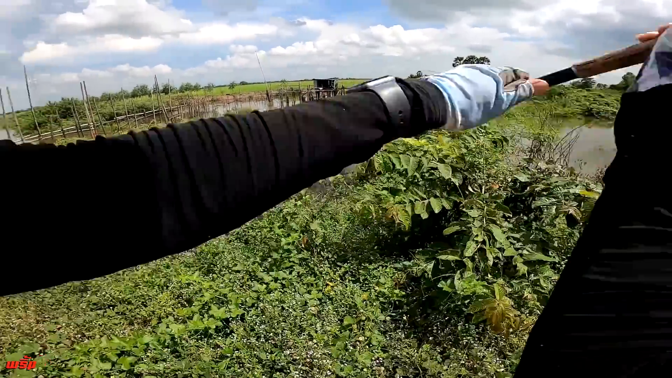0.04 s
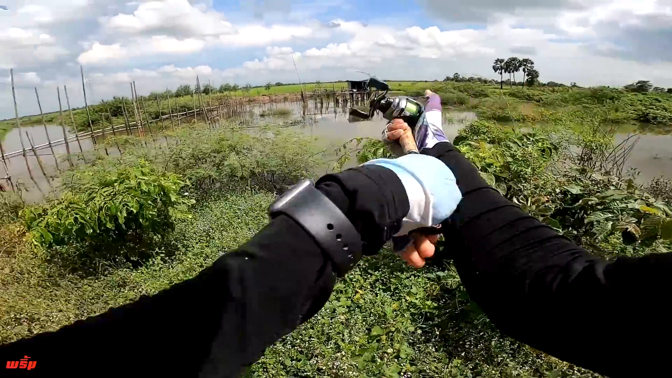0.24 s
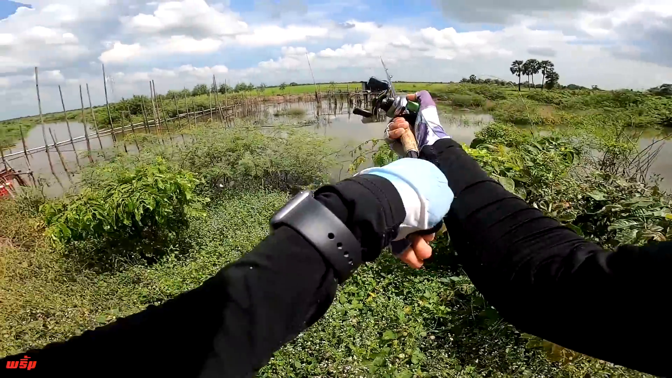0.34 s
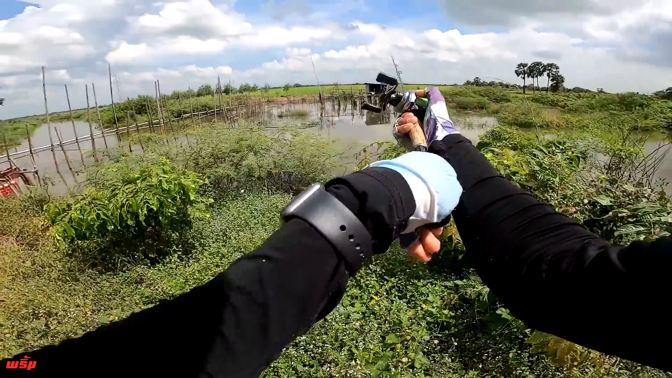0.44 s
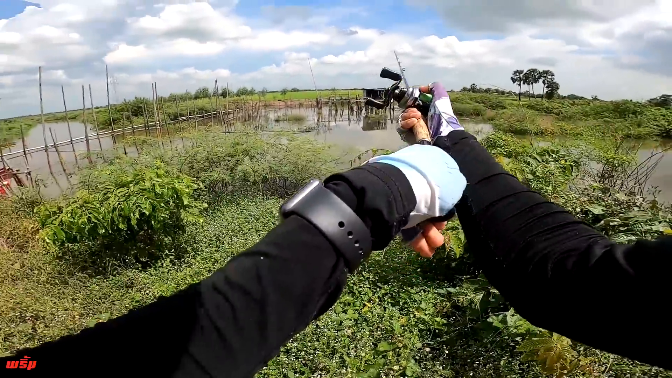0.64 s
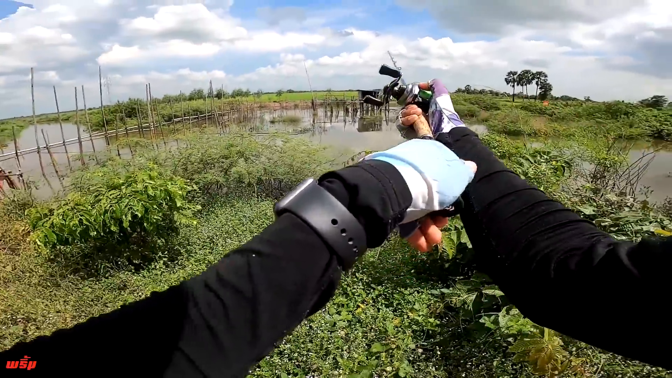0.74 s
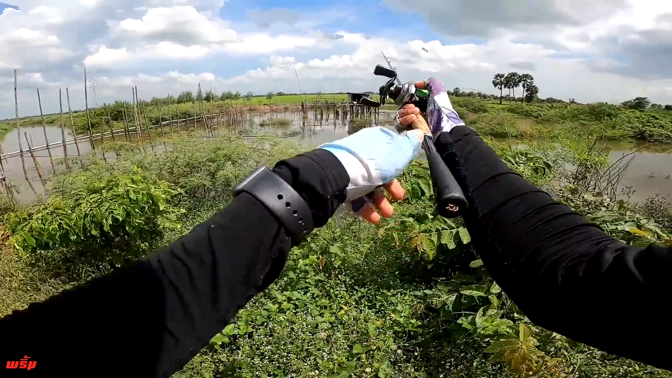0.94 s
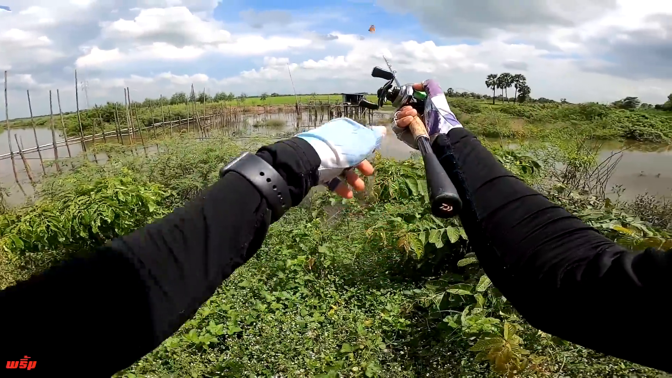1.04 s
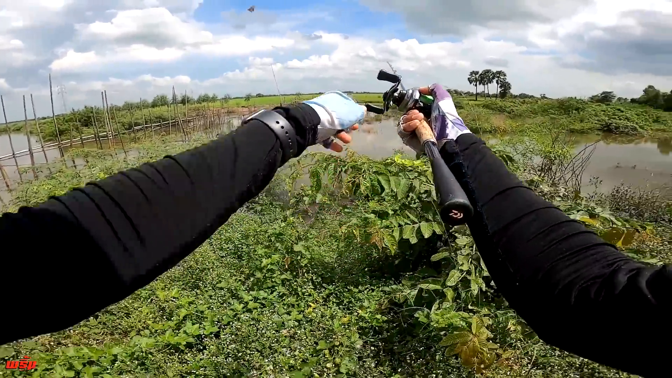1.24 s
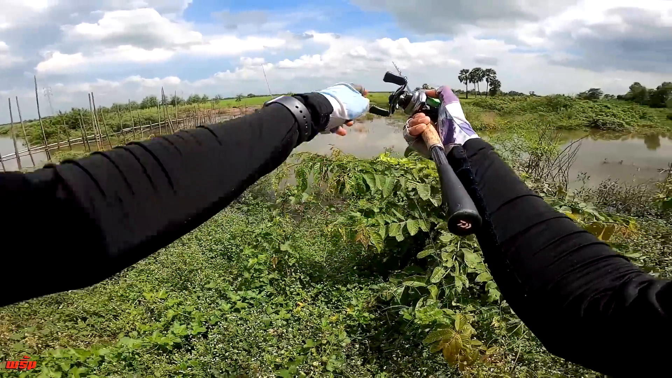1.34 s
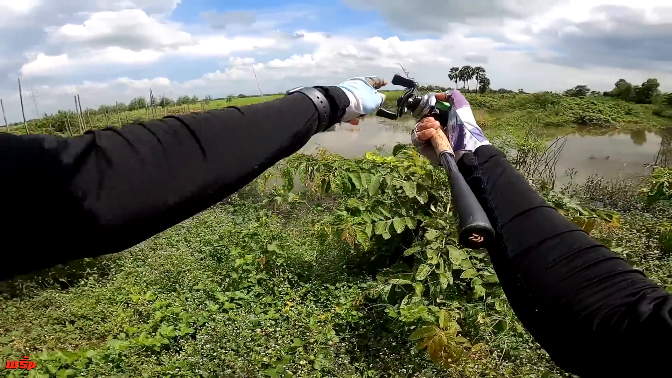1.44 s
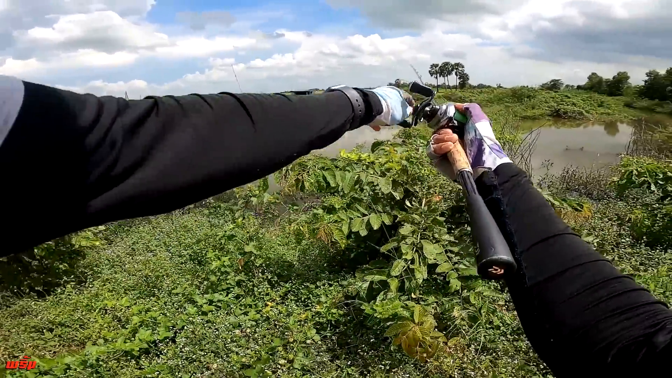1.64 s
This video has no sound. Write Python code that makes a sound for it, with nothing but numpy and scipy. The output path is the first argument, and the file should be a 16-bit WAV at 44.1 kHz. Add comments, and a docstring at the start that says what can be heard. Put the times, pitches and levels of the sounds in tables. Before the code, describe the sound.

Close, nearly centred outdoor sound of a fishing cast: sharp click, fast bright whoosh with line chatter, whirring reel slowing and fading within half a second, small clicks, sleeve rustle, distant bird twitter and light breeze.

```python
"""A cast fishing rod swishes past: noise in narrow bands, some of rising pitch, over a broad rush of air.
The spool whirs down as harmonics of its turning rate; line hisses and rasps in the guides as noise and ringing.
The reel clicks as struck modes, and sleeves and glove rustle as coloured noise. Small birds chirp as falling
sines, an insect buzzes as narrow noise, and open air and a light breeze are coloured noise."""
import sys
import numpy as np
from scipy import signal
from scipy.io import wavfile

SR = 44100
rng = np.random.default_rng(int(sys.argv[2]) if len(sys.argv) > 2 else 0)


def persist_wave(psi):
    """Save psi, clipped to +-1, as 16-bit WAV."""
    counts = np.round(np.clip(psi, -1, 1) * 32767).astype(np.int16)
    wavfile.write(sys.argv[1], SR, np.atleast_2d(counts).T)


N = 74970
TIME = np.arange(N) / SR  # s

# In every colour table below, levels are relative densities per Hz.
# open air: (frequency [Hz], level [dB])
AIR_COLOUR = [(30, -15), (210, 3), (650, 1), (1100, -9.5), (2500, -7), (4000, -3), (5500, -9.5),
              (7200, -14), (9500, -54), (12500, -17.5), (14500, -50)]
AIR_DB = -49
# breeze on the microphone: (time [s], level [dB])
BREEZE_LEVEL = [(0, -51.5), (.15, -68), (.28, -52), (.4, -70), (.75, -75), (.9, -58.5), (1.15, -51),
                (1.46, -54), (1.57, -46), (1.7, -56)]
# colour of the breeze: (frequency [Hz], level [dB])
BREEZE_COLOUR = [(25, -17.5), (55, 8.5), (160, 1), (400, -29), (1500, -65)]

# bursts of the insect's buzz: (start [s], length [s], peak level [dB])
BUZZES = [(.64, .058, -58.5), (0.989, 0.15, -60.5), (1.32, .14, -65)]
BUZZ_HZ, BUZZ_WIDTH_HZ = 11150, 280

# bird chirps, each a short fall: (middle time [s], middle pitch [Hz], peak level [dB])
CHIRPS = [(.585, 4140, -43.5), (.775, 4150, -44.5), (.827, 3870, -42.5), (.852, 4150, -47),
          (.932, 3920, -46), (1.033, 4650, -48), (1.048, 5550, -48), (1.104, 3820, -44),
          (1.221, 3830, -45.5), (1.24, 3790, -44.5)]
CHIRP_S, CHIRP_FALL_HZ_PER_S, CHIRP_WAVER_HZ = 0.029, 30000, 90
# the rest of the flock, swelling and fading about one moment
CHORUS_HZ, CHORUS_WIDTH_HZ, CHORUS_DB, CHORUS_FLUTTER_DB = 4024, 730, -49.5, 2.1
CHORUS_S, CHORUS_SPREAD_S = 0.74, 0.32

# sleeves and glove rubbing: (time [s], level [dB])
RUSTLE_LEVEL = [(0, -47), (.045, -44), (.15, -50.5), (.2, -38.5), (.3, -40), (.86, -55.5), (.92, -41.5),
                (.98, -40.5), (1.09, -45.5), (1.14, -52.5), (1.42, -56.5), (1.485, -47), (1.56, -54.5),
                (1.62, -47.5), (1.7, -56)]
# colour of the rubbing: (frequency [Hz], level [dB])
RUSTLE_COLOUR = [(120, -8.5), (270, -1.5), (700, -8), (950, -8), (1350, -3), (3000, -2.5), (5000, -7.5),
                 (8000, -22), (14000, -28)]
# forearm sweeping across to the reel: (time [s], level [dB])
SLEEVE_LEVEL = [(1.36, -65), (1.45, -53.5), (1.52, -47), (1.63, -46), (1.7, -49)]
# colour of the sweep: (frequency [Hz], level [dB])
SLEEVE_COLOUR = [(100, 3), (300, -3.5), (700, 3), (1300, -13), (3000, -25), (3900, 1.5), (4800, -2),
                 (5800, -11), (8500, -15), (11000, -37), (14000, -53)]

# clicks of the reel and grip: (time [s], strength [dB])
CLICKS = [(.045, -27.5), (.199, -18), (.2535, -21), (.667, -24.5), (.7325, -31), (.783, -31), (.892, -28),
          (.984, -26)]
# modes the clicks excite: (frequency [Hz], strength before softening [dB], t60 [s])
REEL_MODES = [(1300, -13.5, 0.015), (2030, -10, 0.012), (2500, 0.5, 0.0028), (3590, -1.5, 0.0067),
              (7160, -17, 0.0038)]
CONTACT_HZ, MODE_SPREAD_DB = 3600, 1  # soft contacts strike weakly above this frequency

# line rasping on the guides as it is snatched off the spool: (time [s], level [dB])
RASP_LEVEL = [(.22, -67), (.236, -29.5), (.28, -34), (.299, -23.5), (.313, -29), (.336, -24.5), (.37, -77)]
# modes of the guides: (frequency [Hz], relative level [dB], t60 [s])
GUIDE_MODES = [(3450, -0.5, 0.015), (3790, 0.5, 0.02), (4550, 0.5, 0.0043)]
RASP_PER_S, RASP_SPREAD_DB = 2400, 2  # mean contact rate; scale of their uneven sizes

# line running through the guides: (time [s], level [dB])
LINE_LEVEL = [(.22, -54), (.3, -24.5), (.385, -36), (.425, -36), (.5, -43.5), (.62, -48), (.665, -38),
              (.69, -54.5), (.735, -41.5), (.77, -55), (.9, -50), (1.3, -89)]
# colour of the line's hiss: (frequency [Hz], level [dB])
LINE_COLOUR = [(150, -20), (300, -1), (600, 2), (900, -7), (1700, 4), (2700, -1), (3800, 3), (5500, -10),
               (7000, -7), (9000, -44), (12000, -8), (15000, -55)]
LINE_THROB = 0.35  # depth as a fraction of the hiss
LINE_RING_HZ, LINE_RING_WIDTH_HZ = 7070, 530
LINE_RING_DB, LINE_RING_FOLLOWS = -32.5, 0.52  # level at a line level of 0 dB; dB per dB of line level

# the spool's speed: (time [s], rate [turns per second])
SPOOL_RATE = [(.26, 392), (.335, 357), (.39, 334), (.435, 316), (.495, 302), (.56, 268), (.62, 239),
              (.69, 213), (.8, 187), (.95, 150)]
# gain of the spool's whir: (time [s], level [dB])
SPOOL_LEVEL = [(.235, -67), (.28, -32.5), (.4, -36.5), (.48, -37.5), (.57, -42), (.65, -45.5), (.77, -50),
               (.86, -72)]
# multiples of the turning rate, from the first up: (level before body, flutter and dulling [dB])
WHIR_ORDERS = [-11.5, -5, -16, -8.5, -5, -8, -7]
WHIR_LOW_HZ, WHIR_TOP_HZ = 230, 2170  # the reel's body passes the whir between these
WHIR_WOBBLE = .0055  # spread as a fraction of the spool's speed
WHIR_FLUTTER_DB, WHIR_DULLING_DB = 4, 11  # both times log10(order); dulling is per octave of slowing

# the rod's swing: (time [s], level [dB])
SWING_LEVEL = [(.17, -86), (.228, -41), (.244, -28.5), (.256, -19.5), (.272, -17), (.286, -17.5),
               (.301, -16), (.311, -21.5), (.333, -27.5), (.35, -37), (.42, -69)]
# pitch of the eddies shed by the rod: (time [s], pitch [Hz])
EDDY_PITCH = [(.243, 882), (.256, 1138), (.271, 1679), (.287, 1644), (.301, 1972), (.321, 2122),
              (.345, 1832)]
# eddy tones: (multiple of that pitch, width [Hz], level [dB])
EDDIES = [(1, 340, -1.3), (2, 440, -11)]
# narrow bands of noise within the swish: (frequency [Hz], width [Hz], level [dB])
SWISH_BANDS = [(761.6, 26, -16), (1144, 57, -18.5), (1497, 78, -15.5), (1738, 76, -22)]
# broad rush of air round the rod: (frequency [Hz], level [dB])
RUSH_COLOUR = [(130, -32), (450, -9), (900, -6.5), (1500, -2.5), (2500, 0), (4000, 0), (5200, -6),
               (7500, -6), (9500, -24), (12000, -6), (14000, -35)]
RUSH_DB, RUSH_PATCHY_DB = -2, 2
TREBLE_HZ, TREBLE_DB_PER_OCTAVE = 2500, 6  # swish treble falls by this below the highest eddy pitch
# the arm's draught on the microphone
PUFF_S, PUFF_WIDTH_S, PUFF_HZ, PUFF_BAND_HZ, PUFF_DB = 0.296, 0.013, 215, 170, -34.5

SPLIT_HZ = 11730  # above this the two microphones disagree
SPLIT_DB, TOP_LOSS_DB = -7.5, -11  # gains of the differing and the shared top treble
OVERLOAD = .7  # ceiling of the rounding, full scale 1
CUTOFF_HZ = 15400


def from_db(db):
    """Logarithmic levels become amplitude ratios."""
    return 10 ** (np.asarray(db) / 20)


def rms_one(x):
    """Normalisation by mean power: scale to rms 1."""
    return x / np.sqrt(np.mean(x ** 2) + 1e-20)


def in_time(rows):
    """Linear interpolation of a two-column curve at every sample."""
    s, values = np.transpose(rows)
    return np.interp(TIME, s, values)


def bell(middle_s, spread_s):
    """Gaussian envelope: a smooth swell and fade of height 1."""
    return np.exp(-.5 * ((TIME - middle_s) / spread_s) ** 2)


def drift(rate_hz):
    """Low-passed white noise: smooth random variation of rms 1."""
    r = np.exp(-2 * np.pi * rate_hz / SR)
    smooth = signal.lfilter([1], [1, -2 * r, r * r], rng.standard_normal(2 * N))
    return rms_one(smooth[N:])  # the filter settles in the first half


def filtered(x, hz, kind, order=2):
    """Butterworth filtering: a maximally flat low-, high- or band-pass."""
    return signal.sosfilt(signal.butter(order, hz, kind, fs=SR, output="sos"), x)


def narrow_noise(hz, width_hz):
    """Quadrature modulation: low-passed noise shifted to a centre that may move; rms 1."""
    a, b = filtered(rng.standard_normal((2, N)), width_hz / 2, "low")
    phase = 2 * np.pi * np.cumsum(hz + np.zeros(N)) / SR
    return rms_one(a * np.cos(phase) + b * np.sin(phase))


def coloured_noise(colour, patchy_db):
    """Spectral shaping in third octaves: noise bands flicker independently; rms 1."""
    edges = 22 * 2 ** (np.arange(30) / 3)
    hz, db = np.transpose(colour)
    white, out = rng.standard_normal((2, N)), 0
    for k, (low, high) in enumerate(zip(edges, edges[1:])):
        # neighbouring bands draw on independent noises
        band = filtered(white[k % 2], [low, high], "band")
        band_db = np.interp(np.log(low * high) / 2, np.log(hz), db)
        out = out + band * from_db(band_db + patchy_db * drift(24.8))
    return rms_one(out)


def ring(hits, hz, t60):
    """Damped resonance: a unit hit starts a decaying sine of initial height 1."""
    r = np.exp(-np.log(1000) / (t60 * SR))
    w = 2 * np.pi * hz / SR
    return signal.lfilter([0, np.sin(w)], [1, -2 * r * np.cos(w), r * r], hits + 1e-18)


def chatter(modes, per_s, spread_db):
    """Random impact excitation: dense contacts of uneven size ring a set of modes; rms 1."""
    sizes = from_db(spread_db * np.minimum(rng.exponential(1, N), 3))
    signs = rng.choice([-1, 1], N)
    hits = sizes * signs * (rng.random(N) < per_s / SR)
    out = 0
    for k, (hz, db, t60) in enumerate(modes):
        out = out + from_db(db) * (-1) ** k * ring(hits, hz, t60)
    return rms_one(out)


def open_air():
    """Broadband ambience: coloured noise of constant mean level."""
    return from_db(AIR_DB) * coloured_noise(AIR_COLOUR, patchy_db=2.9)


def breeze():
    """Wind noise at a microphone: low coloured noise swells in gusts."""
    return from_db(in_time(BREEZE_LEVEL)) * coloured_noise(BREEZE_COLOUR, patchy_db=2)


def insect():
    """Narrow-band noise: short rounded bursts make a high buzz."""
    level = 0
    for s, length, db in BUZZES:
        progress = np.clip((TIME - s) / length, 0, 1)
        level = level + from_db(db) * np.sqrt(np.abs(np.sin(np.pi * progress)))
    return level * narrow_noise(BUZZ_HZ, BUZZ_WIDTH_HZ)


def flock():
    """Superposition of distant voices: fluttering narrow noise stands for a blurred twitter."""
    level = from_db(CHORUS_DB + CHORUS_FLUTTER_DB * drift(32))
    return level * bell(CHORUS_S, CHORUS_SPREAD_S) * narrow_noise(CHORUS_HZ, CHORUS_WIDTH_HZ)


def chirps():
    """Frequency modulation: brief sines fall in pitch with a random waver."""
    out, waver = 0, CHIRP_WAVER_HZ * drift(280)
    for s, hz, db in CHIRPS:
        t = np.clip(TIME - s, -CHIRP_S / 2, CHIRP_S / 2)
        phase = 2 * np.pi * np.cumsum(hz - CHIRP_FALL_HZ_PER_S * t + waver) / SR
        envelope = np.cos(np.pi * t / CHIRP_S) ** 2
        out = out + from_db(db) * envelope * np.sqrt(2) * np.sin(phase)
    return out


def rustle():
    """Friction noise: glove and cloth rub as patchy coloured noise."""
    return from_db(in_time(RUSTLE_LEVEL)) * coloured_noise(RUSTLE_COLOUR, patchy_db=3.5)


def sleeve():
    """Friction noise: a sleeve sweeps as smoother coloured noise."""
    return from_db(in_time(SLEEVE_LEVEL)) * coloured_noise(SLEEVE_COLOUR, patchy_db=1)


def clicks():
    """Modal excitation: each soft impact strikes the reel's modes with strengths of its own."""
    out = 0
    for s, db in CLICKS:
        hit = filtered(1. * (np.arange(N) == int(s * SR)), CONTACT_HZ, "low")
        for k, (hz, mode_db, t60) in enumerate(REEL_MODES):
            strength = from_db(db + mode_db + MODE_SPREAD_DB * rng.standard_normal())
            out = out + strength * (-1) ** k * ring(hit, hz, t60)
    return out


def rasp():
    """Repeated impact: the line chatters through the rod's guides at the launch."""
    return from_db(in_time(RASP_LEVEL)) * chatter(GUIDE_MODES, RASP_PER_S, RASP_SPREAD_DB)


def line(turn):
    """Amplitude modulation: friction hiss throbs once per turn over a faint ring in the guides."""
    db = in_time(LINE_LEVEL)
    hiss = coloured_noise(LINE_COLOUR, patchy_db=2) * (1 + LINE_THROB * np.sin(turn))
    ring_level = from_db(LINE_RING_DB + LINE_RING_FOLLOWS * db) * (TIME > LINE_LEVEL[0][0])
    return from_db(db) * hiss + ring_level * narrow_noise(LINE_RING_HZ, LINE_RING_WIDTH_HZ)


def whir(rate, turn):
    """Harmonics through a fixed body: upper orders flutter more and fade as the rotation slows."""
    out = 0
    for k, db in enumerate(WHIR_ORDERS, 1):
        top_loss = 1 + (k * rate / WHIR_TOP_HZ) ** 24
        low_loss = 1 + (WHIR_LOW_HZ / (k * rate)) ** 4
        passed = (top_loss * low_loss) ** -.5
        change_db = WHIR_FLUTTER_DB * drift(28) + WHIR_DULLING_DB * np.log2(rate / rate.max())
        level = from_db(db + np.log10(k) * change_db)
        out = out + passed * level * np.sin(k * turn + rng.uniform(0, 2 * np.pi))
    return from_db(in_time(SPOOL_LEVEL)) * np.sqrt(2) * out


def spool_and_line():
    """Shared rotation: one slowing, wobbling turn drives the whir and the line's throb."""
    rate = in_time(SPOOL_RATE)
    turn = 2 * np.pi * np.cumsum(rate * (1 + WHIR_WOBBLE * drift(37.4))) / SR
    return whir(rate, turn) + line(turn)


def arm_draught():
    """Air displacement at a microphone: one brief low puff of noise."""
    return from_db(PUFF_DB) * bell(PUFF_S, PUFF_WIDTH_S) * narrow_noise(PUFF_HZ, PUFF_BAND_HZ)


def rod():
    """Vortex shedding: eddy tones follow the pitch curve with a rush of air and a few narrow fixed bands."""
    pitch = in_time(EDDY_PITCH)
    swish = from_db(RUSH_DB) * coloured_noise(RUSH_COLOUR, RUSH_PATCHY_DB)
    for multiple, width, db in EDDIES:
        swish = swish + from_db(db) * narrow_noise(multiple * pitch, width)
    for hz, width, db in SWISH_BANDS:
        swish = swish + from_db(db) * narrow_noise(hz, width)
    # the treble strengthens as the pitch rises
    body = filtered(swish, TREBLE_HZ, "low", order=1)
    treble_gain = from_db(TREBLE_DB_PER_OCTAVE * np.log2(pitch / pitch.max()))
    return from_db(in_time(SWING_LEVEL)) * (body + (swish - body) * treble_gain)


def scene():
    """Partial coherence: all sources sit in the middle, but the top treble differs between microphones."""
    background = open_air() + breeze() + insect() + flock() + chirps()
    handling = rustle() + sleeve() + clicks()
    cast = rasp() + spool_and_line() + arm_draught() + rod()
    sources = background + handling + cast
    # filtering forwards and backwards leaves no phase shift; the result is turned back to run forwards
    top = filtered(sources, SPLIT_HZ, "high", order=8)[::-1]
    top = filtered(top, SPLIT_HZ, "high", order=8)[::-1]
    middle = sources + (from_db(TOP_LOSS_DB) - 1) * top
    # a randomly turning phase makes the side signal differ from the middle
    turned = np.real(signal.hilbert(top) * np.exp(2j * np.pi * drift(73)))
    side = from_db(SPLIT_DB) * turned
    return np.array([middle + side, middle - side])


def record(dry):
    """Saturation and band limiting: the loudest peaks are rounded and the top is cut."""
    rounded = dry / (1 + (dry / OVERLOAD) ** 4) ** .25
    return signal.sosfilt(signal.cheby2(14, 60, CUTOFF_HZ, fs=SR, output="sos"), rounded)


dry = scene()
out = record(dry)
persist_wave(out)
```